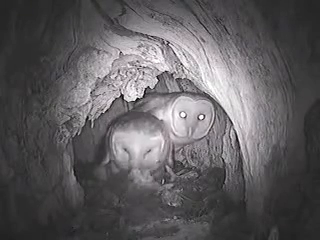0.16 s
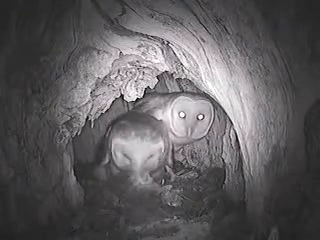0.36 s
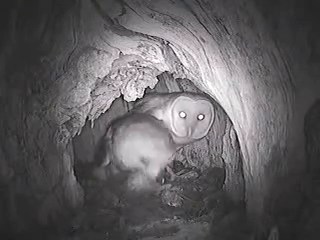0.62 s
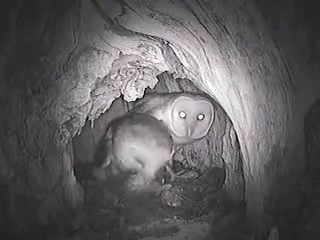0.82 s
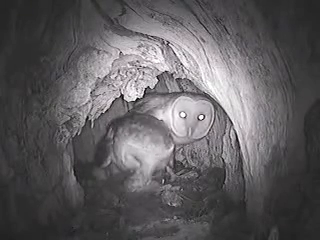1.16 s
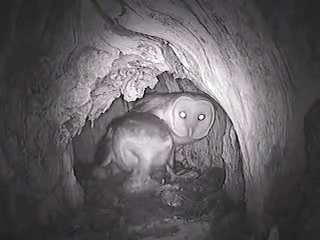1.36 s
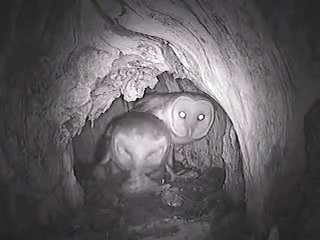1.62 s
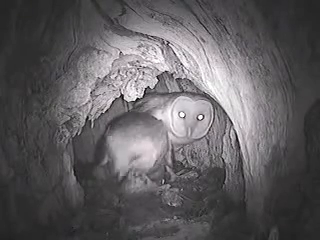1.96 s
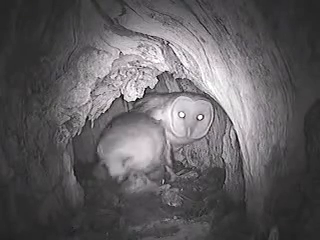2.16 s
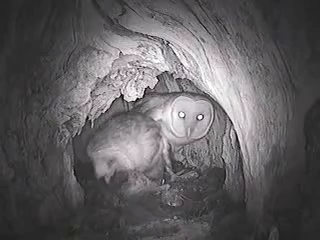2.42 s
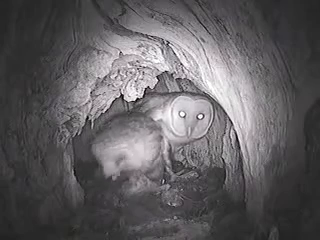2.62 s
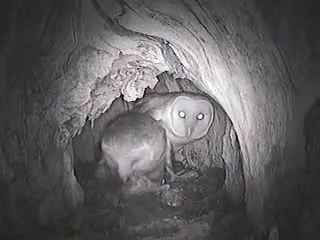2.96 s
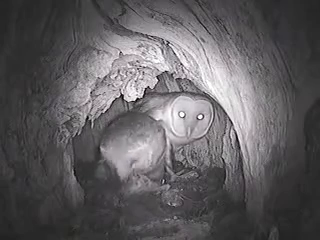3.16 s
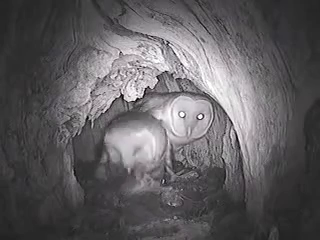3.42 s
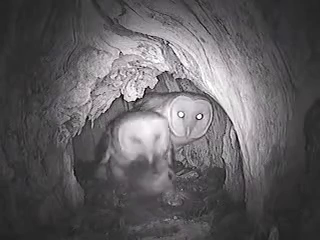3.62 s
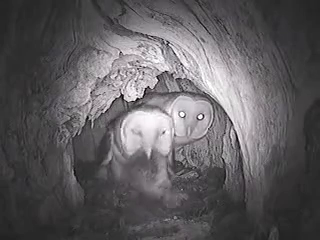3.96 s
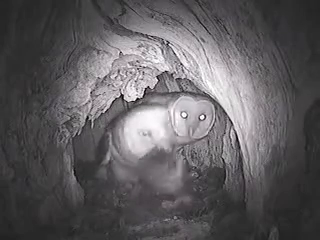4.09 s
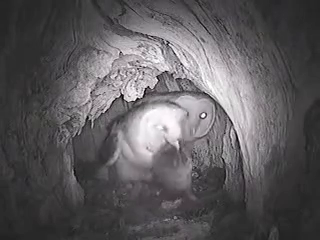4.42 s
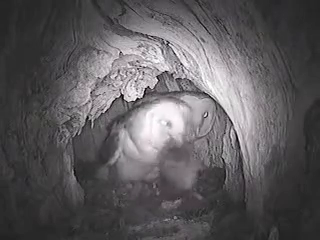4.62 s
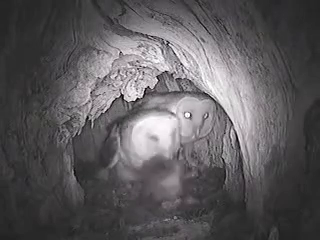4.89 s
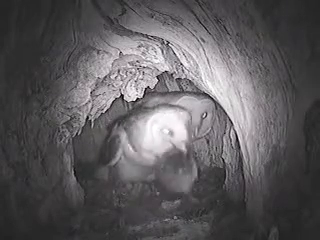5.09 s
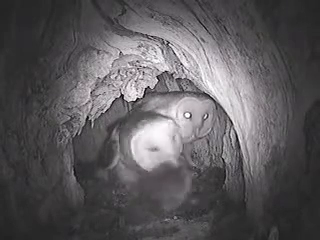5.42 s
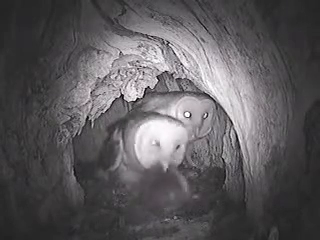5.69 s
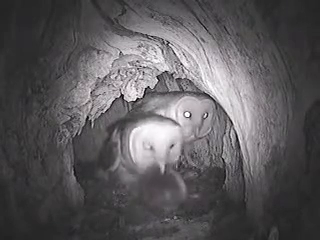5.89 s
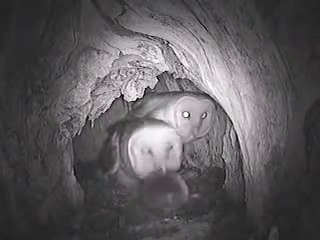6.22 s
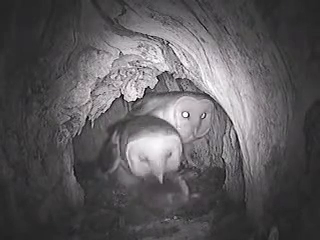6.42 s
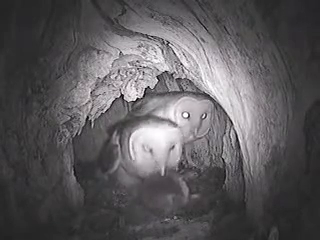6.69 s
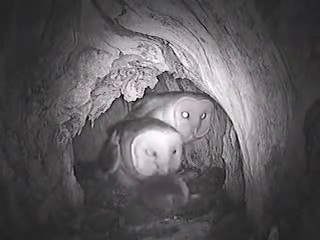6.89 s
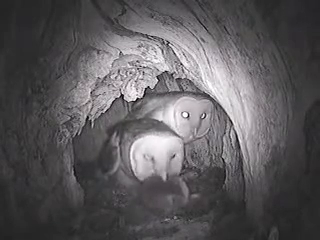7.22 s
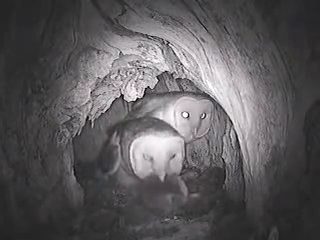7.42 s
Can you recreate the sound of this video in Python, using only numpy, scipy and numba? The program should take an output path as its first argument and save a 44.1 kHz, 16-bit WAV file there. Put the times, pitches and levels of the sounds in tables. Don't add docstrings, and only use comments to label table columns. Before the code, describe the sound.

Close inside a hollow trunk, a barn owl screeches nine times, each a harsh breathy rasp of about a third of a second. Most start with a tiny squeak, jump up in pitch, then sag and cut off. The middle two are a bit quieter, the last ones loud and lower. A second owl wheezes very faintly late on. Steady mains hum and soft hiss underneath; the small camera microphone overloads and sounds grainy and band-limited.

```python
import sys
import numpy as np
from scipy import signal
from scipy.fft import rfft, irfft
from scipy.io import wavfile
from scipy.ndimage import uniform_filter1d
from numba import njit

SR = 44100
rng = np.random.default_rng(int(sys.argv[2]) if len(sys.argv) > 2 else 0)


def how_loud(loudness_db):
    steps = np.asarray(loudness_db, float) / 20
    return 10 ** steps


def put_to_file(sound):
    columns = np.atleast_2d(sound).T
    safe = np.clip(columns, -1, 1)
    whole_steps = np.round(safe * 32767)
    wavfile.write(sys.argv[1], SR, whole_steps.astype(np.int16))


N = 332955
STREAM_HZ, STREAM_TOP_HZ = 16000, 7265


def level(x, db):
    return x * how_loud(db) / np.sqrt(np.mean(x ** 2))


def colour(x, points):
    hz, db = np.transpose(points)
    bins_hz = np.fft.rfftfreq(len(x), 1 / SR) + 1
    gain_db = np.interp(np.log(bins_hz), np.log(hz), db)
    return irfft(rfft(x) * how_loud(gain_db), len(x))


@njit
def svf(x, hz, width_hz):
    y, band, low = np.empty(len(x)), 0., 0.
    for i in range(len(x)):
        g = np.tan(np.pi * hz[i] / SR)
        k = width_hz[i] / hz[i]
        v = (band + g * (x[i] - low)) / (1 + g * (g + k))
        band = 2 * v - band
        low = low + 2 * g * v
        y[i] = k * v
    return y


def ring(hz, width_hz):
    hz = hz + np.zeros(N)
    width_hz = np.maximum(width_hz, 20) + np.zeros(N)
    air = rng.standard_normal(N) * np.sqrt(2 * SR / np.pi / width_hz)
    return svf(svf(air, hz, width_hz), hz, width_hz)


def unsteady():
    k = int(.02 * SR)
    drift = uniform_filter1d(uniform_filter1d(rng.standard_normal(N), k), k)
    return how_loud(2.5 * level(drift, 0))


def electronics():
    # (frequency [Hz], rms level [dB])
    hum_tones = [(60, -53), (120, -70), (180, -75), (240, -81.5), (300, -74.5), (360, -76.5), (420, -80.5)]
    # (frequency [Hz], density [dB per Hz])
    hiss_points = [(10, 9), (40, 4), (100, 5), (180, -2.5), (320, -7.5), (1000, -10), (3000, -14.5),
                   (5000, -16.5), (5550, -19.5), (6000, -16.5), (7200, -17)]
    t = np.arange(N) / SR
    hum = 0
    for hz, db in hum_tones:
        hum = hum + how_loud(db + 3) * np.sin(2 * np.pi * hz * t + 2 * np.pi * rng.random())
    return hum + level(colour(rng.standard_normal(N), hiss_points), -55)


def mate():
    # (start [s], length [s], level [dB])
    wheezes = [
        (5.771, 0.31, -62),
        (7.49, 0.21, -61),
    ]
    fade_db, start_hz, rise_hz = 4, 2140, 430
    out = 0
    for start_s, length_s, peak_db in wheezes:
        u = (np.arange(N) / SR - start_s) / length_s
        db = np.interp(u, [-.1, .15, .9, .93], [-90, peak_db, peak_db - fade_db, -90], left=-120, right=-120)
        out = out + how_loud(db) * ring(start_hz + rise_hz * np.clip(u, 0, 1), 410.)
    return out


def catches():
    # (start [s], peak level [dB], frequency [Hz], length [s])
    squeaks = [
        (.186, -29, 2080, .018),
        (1.947, -33.5, 1950, 0.016),
        (2.794, -32.5, 900, .01),
        (2.813, -21.5, 2350, 0.024),
        (3.688, -36.5, 950, 0.011),
        (4.303, -38.5, 1000, 0.011),
        (5.401, -27, 1050, .011),
        (6.359, -24.5, 1900, .02),
        (7.137, -33, 950, .02),
    ]
    t, out = np.arange(N) / SR, np.zeros(N)
    flutter = 1 + 2.9 * uniform_filter1d(rng.standard_normal(N), size=40)
    for start_s, db, hz, length_s in squeaks:
        cut = slice(int(start_s * SR), int((start_s + length_s) * SR))
        swell = np.sin(np.pi * (t[cut] - start_s) / length_s)
        out[cut] += how_loud(db) * swell * flutter[cut] * np.sin(2 * np.pi * hz * t[cut])
    return out


def screech(t, call, pose, effort):
    start_s, length_s, db, top_hz, widest_s = call
    first_hz, mouth_hz, mouth_db, third_db, fourth_db = pose
    rough, early, cost_db, fading_s, droop_db = effort
    attack_s, release_s, tail_s = .036, .03, .03
    t, shut_s = t - start_s, length_s - release_s
    after = np.maximum(t, 0)
    late = np.maximum(t - widest_s, 0)

    gape = np.interp(t, [0, widest_s, shut_s], [early, 1, -.7]) - .37 * np.exp(-after / .02)
    lack = gape - 1

    body_db = db + 1.5 * np.exp(-abs(t) / .03) - cost_db * np.maximum(gape, 0) ** 2
    edge_s = [-attack_s - .012, -attack_s, 0, min(length_s - fading_s, shut_s), shut_s,
              length_s, length_s + tail_s, length_s + 2 * tail_s]
    edge_db = np.interp(t, edge_s, [-91.5 - db, -52.5 - db, 0, 0, -droop_db, -60 - db, -74 - db, -100 - db])

    settled, leap_s, sag_hz_per_s, round_s = .9, .018, 3200, .013
    climb = settled + (1 - settled) * np.sin(np.pi / 2 * np.minimum(after / widest_s, 1))
    leap_hz = (settled * top_hz - first_hz) * np.exp(-after / leap_s)
    sag_hz = sag_hz_per_s * (np.hypot(late, round_s) - round_s)
    hz = np.maximum(top_hz * climb - leap_hz - sag_hz, .8 * top_hz)

    opening_db = 12 * np.clip(-t / attack_s, 0, 1)
    return (body_db + edge_db, hz, mouth_hz + 197.1 * lack, mouth_db + 8.5 * lack + opening_db,
            third_db + 13 * lack, fourth_db + 12 * lack, rough + .12 * lack, top_hz + 0 * t)


def owl():
    # (full voice [s], length [s], level [dB], top windpipe pitch [Hz], time to widest gape [s])
    calls = [
        (0.214, 0.39, -20.5, 1420, 0.3),
        (1.082, 0.38, -20, 1430, 0.24),
        (1.973, .35, -20, 1391, .25),
        (2.832, .34, -20, 1431, 0.24),
        (3.736, 0.35, -26, 1313, 0.26),
        (4.328, 0.32, -22, 1295, 0.22),
        (5.428, 0.33, -20, 1275, .235),
        (6.384, 0.3132, -18.5, 1270, 0.27),
        (7.172, 0.32, -18.5, 1294, 0.23),
    ]
    # (first windpipe pitch [Hz], then at widest gape: mouth [Hz], mouth band [dB],
    # 3rd overtone [dB], 4th overtone [dB])
    poses = [(1110, 2300, -8, -2.5, -9.5), (1168, 2450, -7.5, -3.5, -9.5), (1166, 2600, -7.5, -7.5, -12.5),
             (1156, 2600, -3, 1, -3.5), (982, 2680, 4, -3, 2), (1065, 2700, 1.5, -3, 1),
             (1053, 2800, -5, -8.5, -9.5), (1124, 2750, -7, -11, -8), (1000, 2800, -3, -6, -3.5)]
    # (roughness [0-1], early gape [share of widest, below 0 = tighter], gaping cost [dB], fading [s],
    # droop [dB])
    efforts = [(.45, 0.01, 2.5, .07, 9), (.47, 0, 1.5, .08, 6.5), (.27, 0, 2, 0.081, 5),
               (.5, -.1, 5, .08, 9), (0.7, 0.3, 3, 0.05, 9), (.45, 0, 5, .07, 11),
               (.35, 0.4, -0.5, 0.061, 6.5), (0.4, .8, 1.5, 0.039, 1), (.4, 0, 3.5, 0.069, 11)]
    cuts = [int((call[0] - .15) * SR) for call in calls[1:]]
    parts = map(screech, np.split(np.arange(N) / SR, cuts), calls, poses, efforts)
    controls = np.concatenate(list(parts), axis=1)
    db, hz, mouth_hz, mouth_db, third_db, fourth_db, rough, top_hz = controls
    rough = np.clip(rough, 0, 1)

    rasp_hz = hz + .3 * (hz - 1200.)
    pipe_width_hz = 800. + 0 * hz
    swing = np.tanh(1.6 * ring(rasp_hz, 55 + 290 * rough))
    voice = how_loud(4.) * svf(svf(swing, rasp_hz, pipe_width_hz), rasp_hz, pipe_width_hz)
    throat = ring(.45 * hz + 450., 380.)
    voice += how_loud(-14 + 18 * rough) * throat
    voice += how_loud(mouth_db) * unsteady() * (ring(mouth_hz, 600.) + how_loud(-6) * ring(2200., 900.))
    voice += how_loud(third_db) * unsteady() * ring(3.01 * hz, 600.)
    fourth = ring(2.1 * hz + 1.8 * top_hz, 750.)
    fourth += how_loud(-6.) * ring(6700., 1200.)
    fourth += how_loud(-8.5) * ring(5000., 4000.)
    voice += how_loud(fourth_db) * unsteady() * fourth
    low_breath = ring(450., 330.)
    voice += how_loud(-17.5 + .49 * mouth_db) * low_breath

    branches = ((740. + 0 * hz, 230., .75), (1.19 * top_hz, 230., .7),
                (3180. + 0 * hz, 220., .6), (3.27 * top_hz, 400., .7))
    for notch_hz, width_hz, depth in branches:
        voice = voice - depth * svf(voice, notch_hz, width_hz + 0 * hz)
    return voice * how_loud(db + .6 * np.maximum(db + 23.5, 0))


def scene():
    return (owl() + mate() + electronics() + catches())[None]


def overload(x):
    rail, knee, lean = .175, 3.4, .044
    x = x / rail
    return rail * x / (1 + abs(x) ** knee) ** (1 / knee) * (1 + lean * np.tanh(x))


def stream(x):
    frame, grid = 1024, 715
    step_db, quiet_db, scatter_db = 7.5, -23.5, 2.6
    local, starve, tilt, follow = .45, .2, .33, .5
    x = np.pad(signal.resample_poly(x, 160, 441), (2 * frame - grid, 2 * frame))
    ride = (uniform_filter1d(x ** 2, size=200) + 1e-5) ** (follow / 2)

    n, k = np.arange(2 * frame), np.arange(frame)
    window = signal.windows.kaiser_bessel_derived(2 * frame, 4 * np.pi)
    cosines = np.cos(np.pi / frame * np.outer(n + .5 + frame / 2, k + .5))
    basis = window[:, None] * cosines * np.sqrt(2 / frame)
    c = np.lib.stride_tricks.sliding_window_view(x / ride, 2 * frame)[::frame] @ basis
    c[:, k * STREAM_HZ / 2 / frame > STREAM_TOP_HZ] = 0

    band = (14 * np.log(1 + k / 100) + k / 64).astype(int)
    starts = np.unique(band, return_index=True)[1]
    power = np.add.reduceat(c ** 2, starts, axis=1) / np.bincount(band) + 1e-14
    typical = np.median(power[:, band], axis=1, keepdims=True)
    coarse = how_loud(step_db) * np.minimum(typical / 8e-3, 1) ** starve
    masked = uniform_filter1d(power, size=7, axis=1)
    step = np.hypot(np.sqrt(masked ** local * typical ** (1 - local)) * coarse, how_loud(quiet_db))
    step = step * how_loud(scatter_db * rng.standard_normal(power.shape))
    step = step[:, band] * (1 + k / 100) ** -tilt
    rounded = np.floor((abs(c) / step) ** .75 + .4) ** (4 / 3)

    frames = (np.sign(c) * rounded * step) @ basis.T
    y = (frames[1:, :frame] + frames[:-1, frame:]).ravel()
    y = (y * ride[frame:frame + len(y)])[frame - grid:]
    return signal.resample_poly(y, 441, 160)[:N]


def mirror_and_grit(y):
    # (frequency [Hz], gain [dB])
    mirror_points = [(8600, -100), (8750, -7.5), (9300, -23.5), (10000, -34.5), (10500, -69.5),
                     (10800, -110)]
    # (frequency [Hz], gain [dB])
    grit_points = [(20, -30), (300, -32.5), (1000, -22), (7300, -31), (8700, -49), (9500, -88.5)]
    image = 2 * y * np.cos(2 * np.pi * STREAM_HZ * np.arange(N) / SR)
    grit = y * rng.standard_normal(N)
    return colour(image, mirror_points) + colour(grit, grit_points)


def low_pass(x):
    return signal.sosfilt(signal.butter(12, 10470, fs=SR, output="sos"), x)


def record(dry):
    converter_bias = .00081
    y = stream(overload(dry[0]) + converter_bias)
    y = colour(y, [(10, 0), (STREAM_TOP_HZ, 0), (STREAM_TOP_HZ + 60, -60)])
    y = y + mirror_and_grit(y)
    return low_pass(y[None])


dry = scene()
out = record(dry)
put_to_file(out)
```